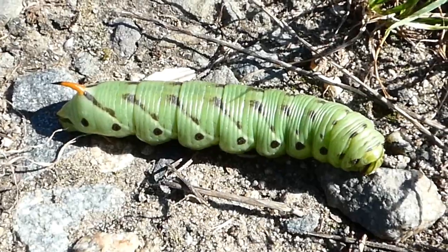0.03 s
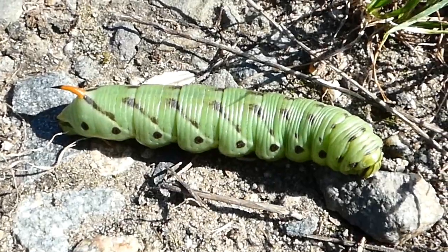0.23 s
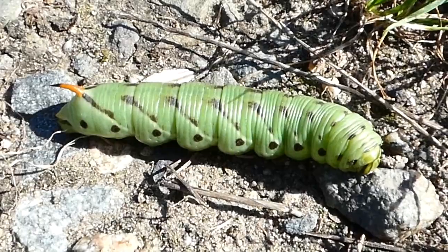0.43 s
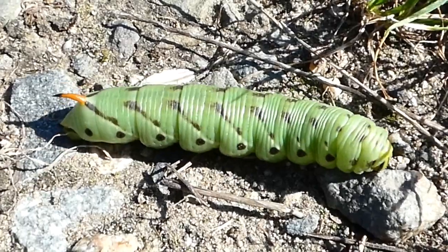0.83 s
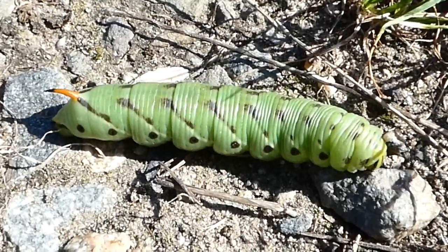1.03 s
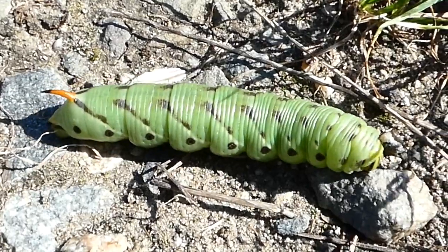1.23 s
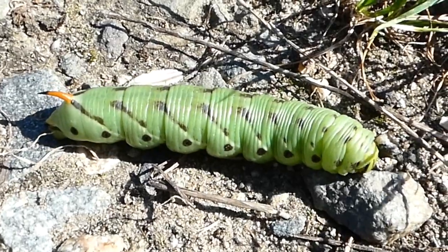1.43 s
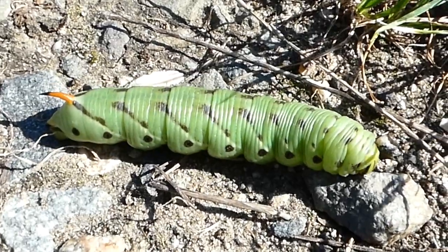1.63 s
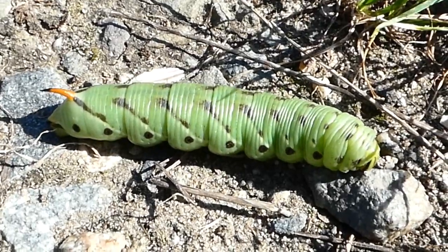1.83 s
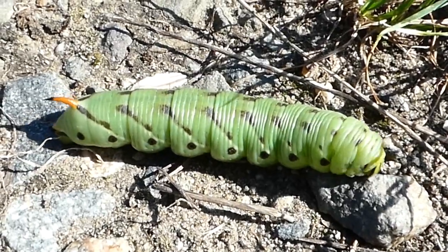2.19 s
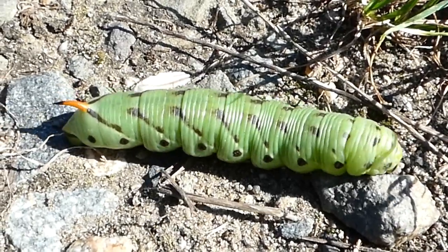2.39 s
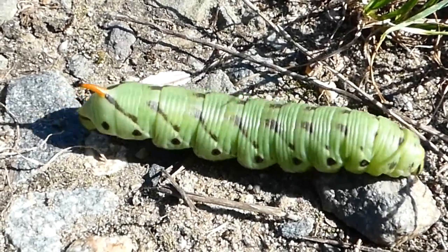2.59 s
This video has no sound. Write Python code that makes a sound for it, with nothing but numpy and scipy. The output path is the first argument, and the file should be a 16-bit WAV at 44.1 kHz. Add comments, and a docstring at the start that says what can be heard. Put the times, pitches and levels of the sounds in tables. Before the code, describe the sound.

Light gusts buffet the microphone with a fluttering low rumble and soft thumps, close to stony ground outdoors. Faint handling scuffs and hiss lie underneath, while a distant bird gives one buzzy chirp, then three thin falling whistles.

```python
"""A steady outdoor hiss and faint scuffs, probably a hand on the camera, are heard first.
Then light gusts buffet the camera's microphone close to dry, stony ground: turbulent pressure at its
ports makes a fluttering low rumble, and single strong eddies make soft thumps.
Far off, a small bird gives one buzzy chirp, a rapidly modulated tone, then three thin falling whistles."""
import sys
import numpy as np
from scipy import signal
from scipy.fft import rfft, irfft, next_fast_len
from scipy.io import wavfile
from scipy.ndimage import map_coordinates

SR = 44100
rng = np.random.default_rng(int(sys.argv[2]) if len(sys.argv) > 2 else 0)


def unload_wav(signal):
    """Save mono or channel-first audio to the path in sys.argv[1] as 16-bit WAV at rate SR, clipped to [-1, 1]."""
    wavfile.write(
        sys.argv[1],
        SR,
        np.round(np.clip(np.atleast_2d(signal).T, -1, 1) * 32767).astype(np.int16),
    )


N = 121275

# Spectra of the outdoor noise (frequency [Hz], relative density [dB])
AIR_SPECTRUM = [(25, -25.5), (60, 0.5), (120, -5), (300, -4), (500, -1.5), (700, -4), (950, -10.5),
                (1300, -14.5), (1700, -21.5), (2200, -21.5), (3000, -22), (5000, -34.5), (9000, -42.5)]
WASH_SPECTRUM = [(200, -35), (700, -0.5), (2500, -4), (4500, -8.5), (7000, -21.5), (12000, -38)]
HISS_SPECTRUM = [(1500, -23), (3500, -2.5), (5000, -0.5), (6800, 1.5), (8050, -1.5), (8400, -8),
                 (8750, -1.5), (10200, 0), (11500, -6), (15400, -14)]
# Their envelopes (time [s], level [dB])
AIR_ENVELOPE = [(0, -59), (.3, -61.5), (1.0, -59.5), (1.7, -61), (2.75, -60)]
WASH_ENVELOPE = [(0, -68.5), (.25, -70.5), (.6, -76.5), (1.0, -83), (2.75, -93)]
HISS_ENVELOPE = [(0, -78.5), (.5, -75), (.63, -74.5), (.72, -72.5), (.82, -76), (1.3, -76), (1.65, -78),
                 (2.2, -77.5), (2.3, -76), (2.42, -77.5), (2.75, -79)]
# Likeness of left and right (frequency [Hz], coherence [ratio])
AIR_COHERENCE = [(100, 0.41), (500, 0.066), (1000, 0.024), (2500, 0.43), (6000, 0.56), (12000, 0.34)]
SCUFF_COHERENCE = [(700, 0.13), (1500, 0.074), (2200, 0.39)]
RUMBLE_COHERENCE = [(60, 0.89), (150, 0.7), (300, 0.44), (600, 0.2)]

# Course of the chirp (time [s], pitch [Hz], level [dB])
CHIRP_CONTOUR = [(1.362, 5500, -95), (1.374, 6840, -76), (1.386, 7400, -78), (1.4, 7050, -75),
                 (1.42, 6830, -71), (1.45, 7000, -71), (1.461, 6220, -71.5), (1.472, 5500, -98)]
# Falling whistles (start [s], length [s], relative level [dB])
WHISTLE_NOTES = [(2.053, .103, -70), (2.239, 0.083, -68.5), (2.44, 0.078, -76)]

# Rubs (peak time [s], fall time [s], relative ring level [dB], relative rasp level [dB])
SCUFF_STROKES = [(0.018, 0.047, -82, -63), (0.176, 0.027, -66, -71.5), (0.235, 0.036, -59, -76),
                 (0.292, 0.11, -82, -66.5), (0.467, 0.041, -62.5, -65.5), (0.564, 0.062, -65.5, -70),
                 (0.618, 0.011, -62, -64.5), (0.692, 0.042, -60, -73), (0.805, 0.016, -53.5, -67),
                 (0.861, 0.035, -61.5, -76), (0.896, 0.02, -74, -68), (0.947, 0.014, -55, -71),
                 (1.018, 0.022, -78, -66), (1.292, 0.017, -65, -66), (1.456, 0.045, -57, -65),
                 (1.516, 0.0088, -58, -72), (1.583, 0.035, -58, -75), (1.621, 0.022, -51, -66),
                 (1.65, 0.015, -51.5, -71), (1.739, 0.014, -59.5, -72), (1.766, 0.04, -63, -70),
                 (1.892, 0.067, -66, -69), (1.98, 0.035, -62, -66), (2.094, 0.12, -64.5, -73),
                 (2.237, 0.042, -60.5, -71.5), (2.278, 0.044, -64, -66.5), (2.477, 0.043, -65.5, -67.5),
                 (2.566, 0.039, -62.5, -77), (2.644, 0.05, -54.5, -66)]
# Resonances excited by rubbing (frequency [Hz], bandwidth [Hz], relative level [dB])
HOLLOW_MODES = [(689, 39, 0.5), (802, 52, -13.5), (456, 31, -4)]
RASP_MODES = [(1140, 130, 0), (1390, 220, 2), (1805, 49, 1.5), (2167, 70, 3.5), (2930, 210, -8)]

# Pushes of air (time [s], relative level [dB], width [s])
PUFF_PULSES = [(1.038, -43, 0.0049), (1.073, -29, 0.0052)]
# Eddies (time [s], relative level [dB], frequency [Hz], half-width [cycles], left minus right [dB])
EDDIES = [(.246, -33.5, 133, 0.72, 0), (0.261, -24, 131, 0.6, 2), (0.281, -36.5, 166, 0.94, 14.5),
          (0.308, -35, 160, .5, -1), (.329, -20, 204, 0.23, 6), (.346, -31, 194, 0.81, 2.5),
          (0.367, -17, 187, 0.46, 1), (.397, -32.5, 180, 0.4, -0.5), (0.434, -30, 187, 0.42, 5.5),
          (0.465, -27.5, 164, 0.23, -2), (0.528, -25.5, 137, 0.77, -1), (.546, -32, 150, 0.44, -4),
          (0.559, -33, 183, 0.53, -5.5), (.581, -24.5, 193, 1.3, -1.5), (.596, -31, 158, .3, 5),
          (0.617, -28, 124, 1.43, 4), (0.649, -25.5, 302, 0.3, -13), (0.71, -31, 139.5, 2.1, 0.5),
          (0.77, -23.5, 152, 0.44, 1), (0.828, -33.5, 129, .5, 3), (0.872, -21.5, 163, 0.72, 0),
          (0.913, -26.5, 140, 0.24, 5), (0.942, -23, 169, 0.48, -3), (0.951, -25, 236, 0.23, -13),
          (1.06, -33, 233, 0.96, -9), (1.089, -28, 173, 0.46, 5), (1.097, -18, 218, 0.69, -4),
          (1.109, -27.5, 210, 0.33, -13), (1.141, -22.5, 268, 0.68, -5.5), (1.149, -29, 159, 0.48, 0),
          (1.166, -24.5, 191, 1.14, -0.5), (1.216, -29.5, 211, 0.45, -2), (1.251, -30, 199, 0.38, 10),
          (1.265, -29, 201, 0.72, 0), (1.276, -28, 227, 0.79, -1), (1.342, -30.5, 210, 1.3, -2.5),
          (1.448, -32, 206, 0.75, 0), (1.501, -36, 179, 0.79, -3), (1.53, -28.5, 183, 1.13, 0),
          (1.596, -32, 184, 0.57, -2), (1.743, -29, 178, 0.52, -1), (1.766, -31.5, 164, 0.72, -1),
          (1.795, -22.5, 207, 0.29, -5), (1.948, -28.5, 200, 0.47, 0), (1.99, -30, 139, 1.1, 0),
          (2.024, -28.5, 149, 0.6, 0.5), (2.087, -26, 197, 0.48, -2), (2.1, -25, 220, 0.28, -7.5),
          (2.141, -24.5, 237, 0.34, -7), (2.171, -21, 191, 0.4, 0), (2.233, -28.5, 192, 1.16, 1.5),
          (2.285, -29.5, 171, 0.97, 2), (2.307, -32, 175, 0.54, 2), (2.321, -29.5, 204, 0.44, -0.5),
          (2.369, -36.5, 182, 0.48, -3.5), (2.433, -40.5, 169, .6, 6), (2.477, -38, 172, 0.42, 2)]
# Thump filters, with full and with thin bass (frequency [Hz], gain [dB])
FULL_RESPONSE = [(20, -40), (50, -22.5), (85, 4), (130, -4), (550, -2), (1000, -10)]
THIN_RESPONSE = [(20, -47), (55, -29), (85, -7.5), (130, -2.5), (550, -1.5), (1000, -17)]
# Spectra of the wind noise (frequency [Hz], relative density [dB])
SWISH_SPECTRUM = [(250, -13), (500, 5), (750, -5), (950, -13), (2200, -20), (6000, -47)]
RUMBLE_SPECTRUM = [(25, -51), (48, -41), (70, -22.5), (105, -1.5), (185, -0.5), (260, -5.5), (370, -14),
                   (500, -26.5), (700, -48), (1200, -77), (3000, -120)]
BASS_SPECTRUM = [(15, -23), (35, -19), (55, -1), (75, 5.5), (110, -5), (160, 9), (300, -41), (1500, -120)]
# Strength of the gusts and of their deepest bass (time [s], level [dB])
GUST_ENVELOPE = [(0, -72), (.17, -62), (.28, -43.5), (.35, -31.5), (.43, -51.5), (.59, -33), (.69, -53),
                 (.76, -45), (.81, -49), (.88, -48.5), (1.0, -45.5), (1.12, -37), (1.2, -38.5), (1.28, -43),
                 (1.4, -49.5), (1.51, -44.5), (1.57, -54.5), (1.7, -49.5), (1.77, -50), (1.86, -47),
                 (1.99, -42), (2.06, -49), (2.19, -40.5), (2.26, -40.5), (2.36, -50.5), (2.49, -50),
                 (2.53, -51), (2.65, -54), (2.72, -66)]
BASS_ENVELOPE = [(0, -48.5), (.08, -82), (.17, -58), (.27, -43), (.37, -58), (.44, -62), (.55, -31.5),
                 (.62, -60), (.72, -49.5), (.86, -41.5), (1.0, -52), (1.1, -59), (1.22, -84), (2.75, -78)]
# Port resonance, applied twice (frequency [Hz], bandwidth per pass [Hz], relative level [dB])
PORT_MODES = [(2250, 135, 0)]

def amp(db):
    """Amplitude grows tenfold every 20 dB."""
    return 10 ** (np.asarray(db) / 20)

def along(points, hz):
    """Interpolation on a logarithmic frequency axis."""
    f, values = np.transpose(points)
    return np.interp(np.log(hz + 1), np.log(f + 1), values)

def clock():
    """Uniform sampling times in seconds."""
    return np.arange(N) / SR

def curves(rows):
    """Linear interpolation in time, one curve per value column."""
    times, *columns = np.transpose(rows)
    return [np.interp(clock(), times, column) for column in columns]

def wobble(rate):
    """Smooth random modulation with rate knots a second."""
    return map_coordinates(rng.standard_normal(1024), [clock() * rate], mode="wrap")

def filtered(x, response):
    """Linear filtering multiplies the spectrum by a response."""
    size = next_fast_len(N + SR // 2)
    return irfft(rfft(x, size) * response(np.fft.rfftfreq(size, 1 / SR)), size)[..., :N]

def slope(points):
    """Frequency response through (frequency [Hz], gain [dB]) points."""
    return lambda hz: amp(along(points, hz))

def resonances(modes, hz):
    """Damped resonators, summed in power."""
    return np.sqrt(sum(np.abs(amp(db) * hz * width / (centre ** 2 - hz ** 2 + 1j * hz * width)) ** 2
                       for centre, width, db in modes))

def noise(response, coherence, drive=1):
    """Modulated, filtered noise of unit rms; the mid-to-side ratio sets its stereo coherence."""
    def mid_side(hz):
        angle = np.arccos(np.clip(along(coherence, hz), -1, 1)) / 2
        return response(hz) * [np.cos(angle), np.sin(angle)]
    mid, side = filtered(drive * rng.standard_normal((2, N)), mid_side)
    stereo = np.array([mid + side, mid - side])
    return stereo / np.sqrt(np.mean(stereo ** 2) + 1e-20)

def drifting(x, depth):
    """Time warping shifts all frequencies by a wandering fraction of scale depth."""
    position = np.cumsum(1 + depth * wobble(14))
    return np.array([np.interp(position, np.arange(N), side) for side in x])

def background():
    """Independent noises add in power: soft outdoor air, a brighter fading wash and a fine hiss."""
    air = amp(curves(AIR_ENVELOPE)[0]) * noise(slope(AIR_SPECTRUM), AIR_COHERENCE)
    wash = amp(curves(WASH_ENVELOPE)[0]) * noise(slope(WASH_SPECTRUM), AIR_COHERENCE)
    hiss = amp(curves(HISS_ENVELOPE)[0]) * noise(slope(HISS_SPECTRUM), AIR_COHERENCE)
    return air * amp([[-.6], [.6]]) + wash + hiss

def bird(buzz_hz=155, swing_hz=380, swell_db=13.5, echo_t60_s=0.14, echo_db=-6):
    """Frequency modulation makes the chirp buzz; whistles swell as they fall, and a short echo follows."""
    t = clock()
    tone = lambda hz: np.sqrt(2) * np.sin(2 * np.pi * np.cumsum(hz) / SR)
    pitch, level = curves(CHIRP_CONTOUR)
    trill = swing_hz * np.sin(2 * np.pi * buzz_hz * t + 0.53 * wobble(60))
    song = amp(level) * tone(pitch + trill) * (t > CHIRP_CONTOUR[0][0]) * (t < CHIRP_CONTOUR[-1][0])
    for start, length, db in WHISTLE_NOTES:
        progress = np.clip((t - start) / length, 0, 1)
        gate = np.clip(np.minimum(progress, 1 - progress) * 10, 0, 1)
        glide_hz = np.interp(progress, [0, 1], [6800, 5760]) + 35 * wobble(200)
        song += gate * amp(db - swell_db * (1.5 - progress)) * tone(glide_hz)
    tail = rng.standard_normal((2, SR // 2)) * amp(-60 * t[:SR // 2] / echo_t60_s)
    echo = signal.fftconvolve(song[None], tail / np.linalg.norm(tail[0]), axes=1)[:, :N]
    return song + amp(echo_db) * echo

def scuffs(rise_to_fall=0.47, steady_rub_db=-76):
    """Friction excites resonances: short rubs sound a hollow ring over a rasp that never quite stops."""
    t = clock()
    ring_gain, rasp_gain = 0, amp(steady_rub_db)
    for peak, fall, ring_db, rasp_db in SCUFF_STROKES:
        width = fall * np.where(t < peak, rise_to_fall, 1)
        swell = np.exp(-2 * ((t - peak) / width) ** 2)
        ring_gain += swell * amp(ring_db)
        rasp_gain += swell * amp(rasp_db)
    grain = amp(2.4 * wobble(240))
    def rubbed(modes, cutoff_hz):
        response = lambda hz: resonances(modes, hz) / np.sqrt(1 + (hz / cutoff_hz) ** 6)
        return noise(response, SCUFF_COHERENCE, grain)
    ring = ring_gain * drifting(rubbed(HOLLOW_MODES, cutoff_hz=1060), depth=0.0248)
    rasp = rasp_gain * rubbed(RASP_MODES, cutoff_hz=4500)
    return ring * amp([[2.5], [3]]) + rasp * amp([[-1.5], [2.5]])

def puffs():
    """Air pushed into the left port makes smooth pressure pulses, whose energy lies in the bass."""
    pressure = np.zeros(N)
    for peak, db, width in PUFF_PULSES:
        offset = (clock() - peak) / width
        pressure += amp(db) * (1 - offset ** 2) * np.exp(-offset ** 2 / 2)
    return pressure * amp([[-2], [-22]])

def thumps(rise_to_fall=0.69, half_delay_s=0.00036, swish_db=-33.5, bass_thins_s=1.1):
    """Each strong eddy is a brief, hissing pressure swing that reaches one port before the other."""
    t, sides = clock(), np.array([[1], [-1]])
    pressure, strength = np.zeros((2, 2, N))
    wander_cycles = 0.11 * wobble(170)
    for (peak, db, hz, width, pan), (phase, lead) in zip(EDDIES, rng.random((len(EDDIES), 2))):
        near = np.abs(t - peak) * hz < 10 * width
        cycles = (t[near] - peak + sides * half_delay_s * np.sign(lead - .5)) * hz
        steepness = np.where(cycles < 0, rise_to_fall ** -.5, rise_to_fall ** .5)
        envelope = amp(db + sides * pan / 2) / np.cosh(cycles / width * steepness)
        pressure[:, near] += envelope * np.cos(2 * np.pi * (cycles + phase + wander_cycles[near]))
        strength[:, near] += envelope
    swish = amp(swish_db) * strength * noise(slope(SWISH_SPECTRUM), SCUFF_COHERENCE)
    crossfade = np.clip((t - bass_thins_s) * 20, 0, 1)
    full = filtered(pressure * (1 - crossfade), slope(FULL_RESPONSE))
    thin = filtered(pressure * crossfade, slope(THIN_RESPONSE))
    return full + thin + swish

def rumble(flutter_db=8.5, eddies_per_s=50, ring_peak_db=-74.5):
    """Turbulence modulates the pressure noise of slow gusts and excites a faint resonance at the ports."""
    gust_db, = curves(GUST_ENVELOPE)
    bass_db, = curves(BASS_ENVELOPE)
    flutter = amp(flutter_db * np.tanh(wobble(eddies_per_s)))
    body = amp(gust_db) * noise(slope(RUMBLE_SPECTRUM), RUMBLE_COHERENCE, flutter)
    bass = amp(bass_db) * noise(slope(BASS_SPECTRUM), coherence=[(50, 0.54)], drive=flutter)
    ring = noise(lambda hz: resonances(PORT_MODES, hz) ** 2, coherence=[(2000, .6)], drive=flutter)
    ring_db = ring_peak_db + 0.46 * (gust_db - gust_db.max())
    return body + bass + amp(ring_db) * ring

def scene():
    """Superposition: wind on the microphone dominates the fainter sources."""
    return rumble() + thumps() + puffs() + scuffs() + background() + bird()

def record(dry):
    """The camera's band limit acts as an ideal low-pass filter."""
    return filtered(dry, lambda hz: hz < 15600)

dry = scene()
out = record(dry)
unload_wav(out)
```